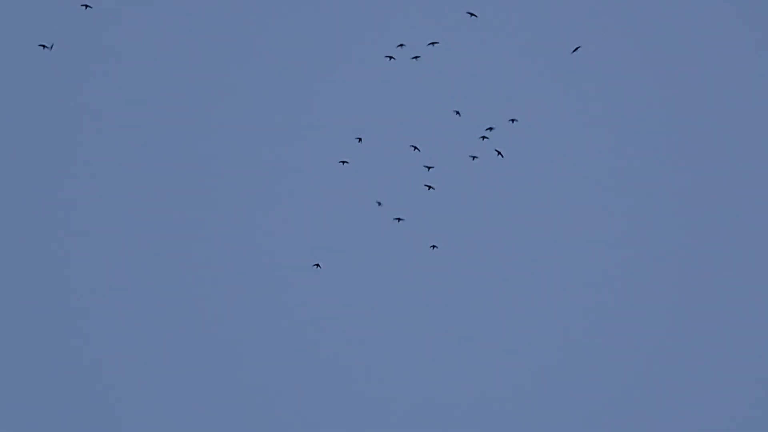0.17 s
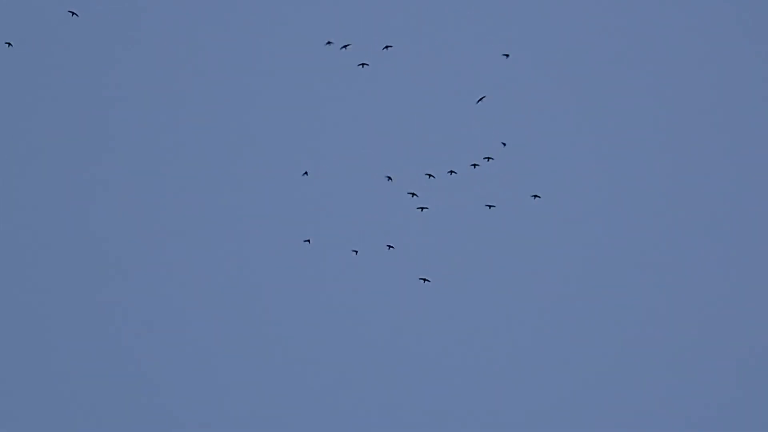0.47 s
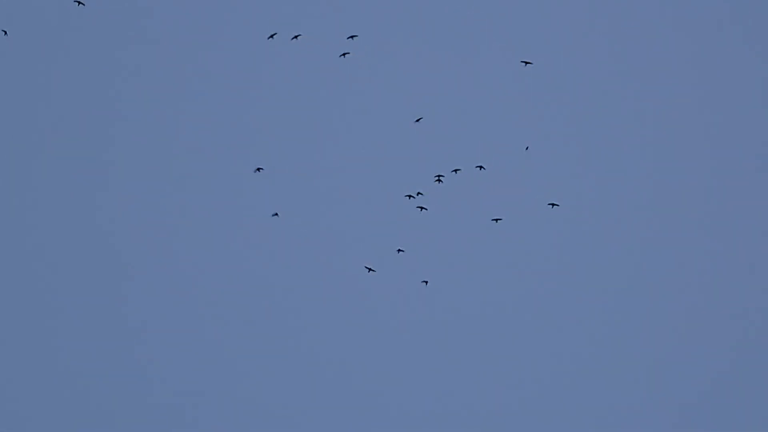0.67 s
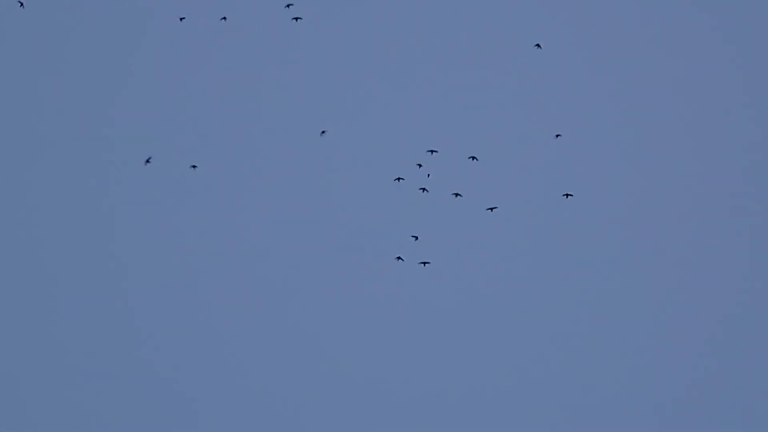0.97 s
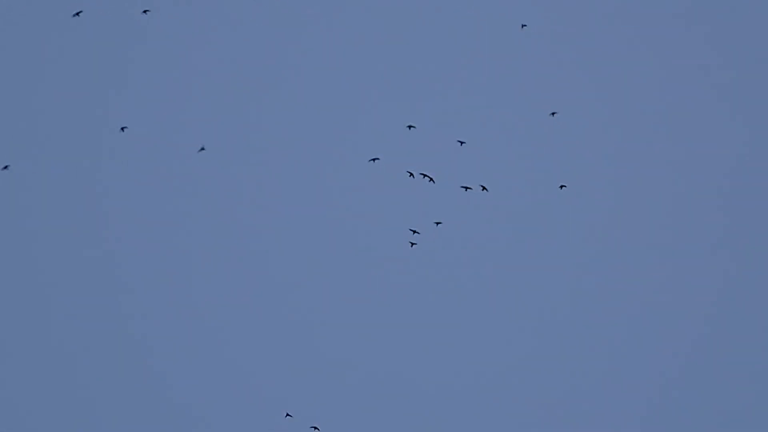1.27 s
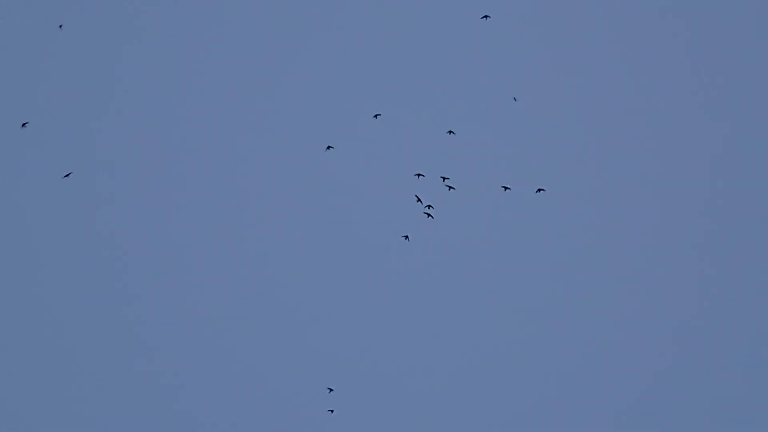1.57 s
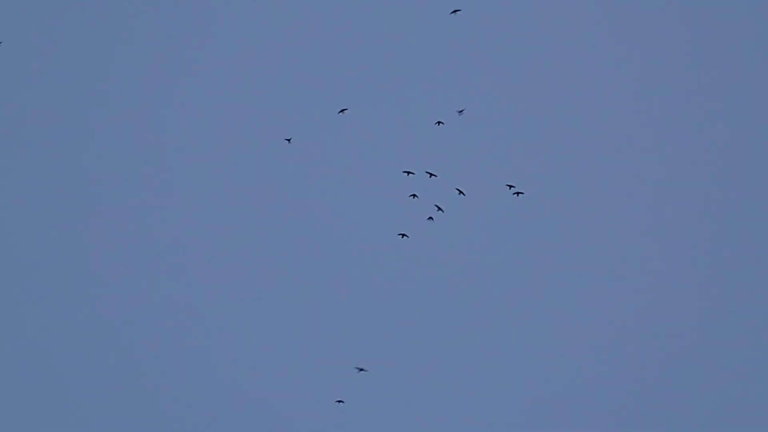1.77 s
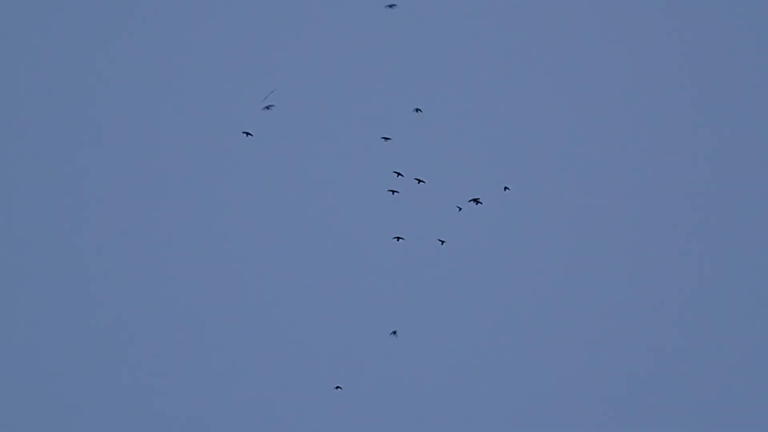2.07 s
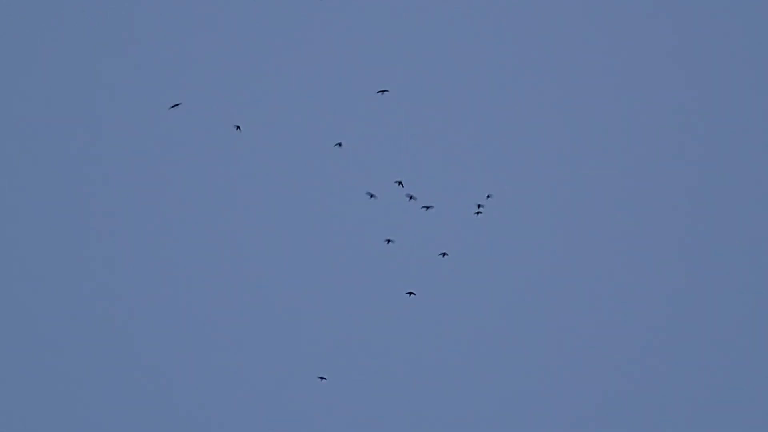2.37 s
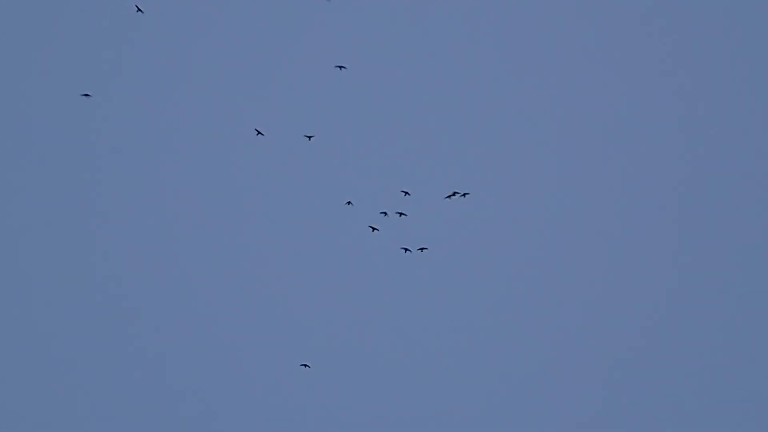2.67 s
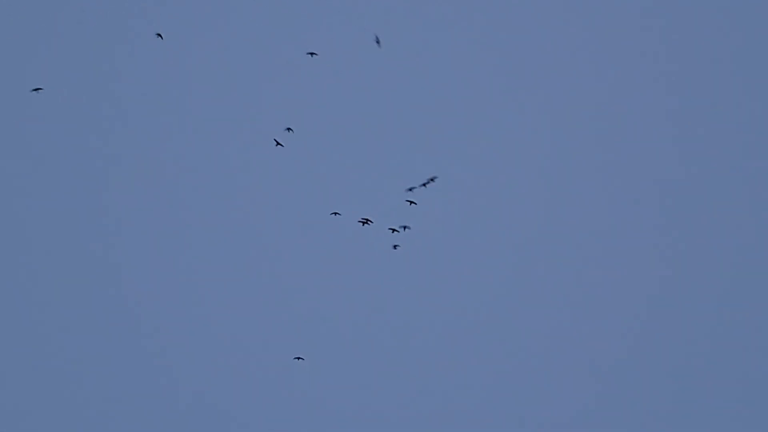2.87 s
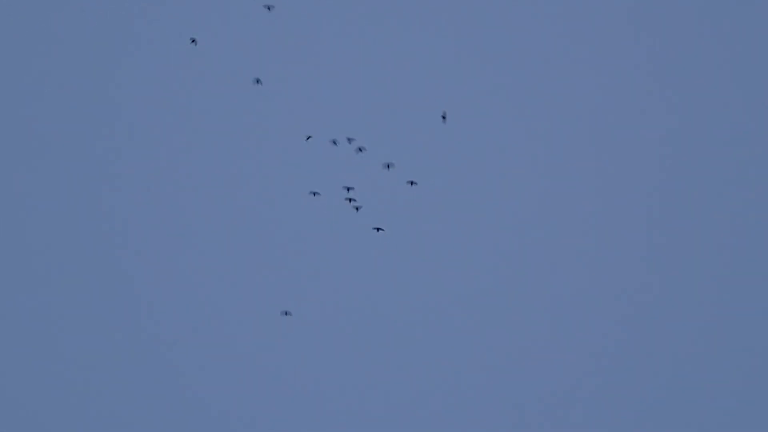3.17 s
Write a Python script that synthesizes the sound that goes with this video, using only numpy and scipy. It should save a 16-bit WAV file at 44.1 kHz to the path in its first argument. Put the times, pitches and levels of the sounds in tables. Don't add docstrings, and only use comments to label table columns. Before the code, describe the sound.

Cicadas dominate: a dense, bright hum around 5 to 6 kHz, wide and diffuse, with a fine pulsing buzz slightly left. A nearer, stronger group sings until about 1.9 s, then cuts off, leaving the far chorus and a thin hiss. Small chirps at 0.9, 1.4 and 2.7 s, faint twitter, low coos from 3.0 s. Low air and road rumble recedes beneath. No wingbeats.

```python
import sys
import numpy as np
from scipy import signal
from scipy.fft import rfft, irfft
from scipy.io import wavfile
from scipy.ndimage import uniform_filter1d

SR = 44100
rng = np.random.default_rng(int(sys.argv[2]) if len(sys.argv) > 2 else 0)


def unload_audio(sound):
    columns = np.transpose(np.atleast_2d(sound))
    steps = np.round(np.clip(columns, -1, 1) * 32767)
    wavfile.write(sys.argv[1], SR, steps.astype(np.int16))


def decibels_to_gain(level_db):
    exponent = np.asarray(level_db, float) / 20
    return 10 ** exponent


N = 146853

# (frequency [Hz], density [dB per Hz])
FAR_BODY = [(4300, -28), (4950, -13), (5250, -4.5), (5600, 0.5), (6150, -4), (6620, -4.5), (7000, -15.5),
            (7350, -30.5)]
FAR_OVERTONE = [(7200, -49), (7480, -34), (7680, -28.5), (8300, -38.5), (9800, -41.5), (11800, -37),
                (13800, -46.5), (15700, -43)]
# (time [s], level [dB])
NEAR_EFFORT = [(0, -28), (.13, -27.5), (.3, -29.5), (.7, -31), (.8, -28), (1.2, -29), (1.5, -28.5),
               (1.73, -27.5), (1.885, -28), (1.915, -46), (1.96, -80)]
# (frequency [Hz], density [dB per Hz])
NEAR_BODY = [(900, -32.5), (3600, -42.5), (4550, -29.5), (5250, -4.5), (5550, -5), (5820, -4), (6150, -33),
             (7200, -52)]
NEAR_OVERTONE = [(7400, -79), (8800, -39.5), (10000, -44), (11700, -39), (13000, -43), (14200, -50),
                 (15700, -45)]
RIBS_HZ = (4955, 5207, 5416, 5545, 5710, 5808)
# (frequency [Hz], density [dB per Hz])
AIR_COLOUR = [(15, -50), (25, -21.5), (70, 2.5), (103, -10), (188, -16), (328, -20.5), (772, -24.5),
              (878, -28), (4200, -39), (5460, -49), (9240, -120)]
# (frequency [Hz], density [dB per Hz])
ROAD_COLOUR = [(40, -18), (70, -7.5), (170, 1), (230, -14.5), (400, -14.5), (800, -23), (2200, -21.5),
               (4500, -36)]
# (time [s], level [dB])
ROAD_LEVEL = [(0, -37), (.25, -40.5), (.6, -42.5), (1, -46), (1.45, -48), (1.7, -49), (2.2, -54.5),
              (3.33, -50)]
# (time [s], pitch [Hz], level [dB], length [s])
CHIRPS = [(.848, 4700, -54, .008), (.897, 4270, -53, 0.012), (.945, 4100, -58, .014),
          (.992, 4180, -58, .014), (1.372, 4900, -39.5, 0.016), (1.42, 4670, -46, 0.016),
          (2.652, 4890, -45, .008), (2.698, 4840, -40, .021), (2.746, 4712, -43.5, 0.044),
          (2.798, 4720, -51, .028), (2.828, 4740, -52, .03), (2.845, 3450, -63, .016),
          (2.9, 3320, -63, 0.012), (.16, 2580, -59.5, .07), (.45, 2110, -56, .06), (1.57, 3020, -64, .04),
          (1.755, 3800, -58, 0.017), (2.13, 3050, -66, 0.046), (1.84, 3200, -68, .04),
          (3.085, 4740, -50, .012)]
# (time [s], pitch [Hz], level [dB], length [s])
COOS = [
    (3.025, 526, -52, 0.077),
    (3.09, 520, -51.5, .13),
    (3.19, 536, -46, .1),
    (1.38, 1240, -61.5, 0.13),
    (1.63, 1320, -58, 0.134),
    (1.83, 1280, -58.5, .07),
    (.44, 1000, -54.5, 0.035),
    (.72, 770, -53, 0.072),
]
# (frequency [Hz], density [dB per Hz])
HISSER_COLOUR = [(6500, -42), (7000, -2), (7450, -6), (7650, 1), (8200, -9), (8800, -10), (9400, -28),
                 (10000, -60)]
# (time [s], level [dB])
HISSER_LEVEL = [(0, -85), (1.88, -80), (1.93, -56), (3.33, -56)]
# (frequency [Hz], left-right likeness [0-1])
LIKENESS = [(70, 0.99), (300, 0.92), (800, 0.41), (1750, 0.067), (2400, 0.49), (4500, 0.067), (8200, 0.35),
            (10000, 0.16)]
# (frequency [Hz], lead [rad])
LEAD = [(60, 0.4), (400, -.5), (1380, -2.5), (2750, -4.5), (4100, -9), (5500, -12), (6800, -11.5),
        (7500, -15.5)]
# (frequency [Hz], left over right [dB])
TILT = [(60, -1), (180, 0), (550, -0.5), (1650, 0.0), (4970, 1.5), (15000, 1)]

CLICK_JITTER, FOLIAGE_WET, SWAY_PER_S = .12, .58, 2.493
RIB_WIDTH_HZ, RIB_DB = 18, 4
BUZZ_DB, BUZZ_PAN_DB, BUZZ_LAG_S = -43, 4.0, .00002
BUZZ_HZ, BUZZ_PULSES_HZ, BUZZ_DRIFT_HZ, BUZZ_RING_S = 6346, 61.0, 3.5, .0045
BUZZ_BODY_HZ, BUZZ_WIDTH_HZ = 6395, 240
TWITTER_DB, TWITTER_FADE_DB_PER_S, TWITTER_HZ, TWITTER_S = -62, -1.5, (500, 4200), (.02, .06)
CHIRP_FALL_HZ_S, CHIRP_ECHO_DB, CHIRP_T60_S = 5.0, -1, .22


def evened(x):
    return x / np.sqrt(np.mean(x ** 2) + 1e-20)


def read(points, hz):
    f, value = np.transpose(points)
    return np.interp(np.log(hz + 1), np.log(f + 1), value)


def curve(points):
    return np.interp(np.arange(N) / SR, *np.transpose(points))


def wander(top_hz, count=24):
    t = np.arange(0, N + 64, 64) / SR
    slow = 0
    for f in np.geomspace(.3, top_hz, count):
        turns = f * rng.uniform(.9, 1.1) * t + rng.random()
        slow = slow + np.sin(2 * np.pi * turns) / np.sqrt(f)
    return np.interp(np.arange(N) / SR, t, evened(slow))


def resonate(x, hz, width_hz):
    turn = np.exp(2j * np.pi * hz * np.arange(len(x)) / SR)
    r = np.exp(-np.pi * width_hz / SR)
    return 2 * (turn * signal.lfilter([1 - r], [1, -r], x / turn)).real


def ports(two, gain):
    hz = np.fft.rfftfreq(N, 1 / SR)
    a, b = rfft(two)
    same = np.clip(read(LIKENESS, hz), 0, 1)
    tilt = decibels_to_gain(read(TILT, hz) / 2)
    left = a * tilt
    right = (same * np.exp(1j * read(LEAD, hz)) * a + np.sqrt(1 - same ** 2) * b) / tilt
    return evened(irfft(np.array([left, right]) * gain(hz), N))


def scatter(x, t60_s):
    t = np.arange(int(.3 * SR)) / SR
    tail = rng.standard_normal((2, len(t))) * decibels_to_gain(-60 * t / t60_s)
    return signal.fftconvolve(x, tail / np.linalg.norm(tail[0]), axes=1)[:, :N]


def swaying(x, t60_s):
    turn = np.pi * SWAY_PER_S * np.arange(N) / SR
    return sum(scatter(x * np.cos(turn + k * np.pi / 3) ** 2, t60_s) for k in range(3))


def chorus(body, overtone, clicks_hz, spread, swell_db, count):
    singers = np.zeros((2, N))
    for k in range(count):
        rate_hz = clicks_hz * (1 + spread * rng.uniform(-1, 1) + .004 * wander(3))
        jitter = CLICK_JITTER * uniform_filter1d(rng.standard_normal(N), 40) * 6
        turns = np.cumsum(rate_hz) / SR + jitter
        clicks = np.diff(np.floor(turns), prepend=0) > 0
        strength = 1 + .33 * rng.standard_normal(N)
        singers[k % 2] += clicks * strength * decibels_to_gain(swell_db * wander(12))
    smeared = (1 - FOLIAGE_WET) * singers + FOLIAGE_WET * swaying(singers, .13)

    def gain(hz):
        ribs_db = RIB_DB * sum(1 / (1 + ((hz - f) / RIB_WIDTH_HZ) ** 2) for f in RIBS_HZ)
        body_db = read([(300, -109)] + list(body) + [(7700, -78)], hz) + ribs_db
        return np.hypot(decibels_to_gain(body_db), decibels_to_gain(read(overtone, hz)))

    return ports(smeared, gain)


def far_chorus():
    return decibels_to_gain(-31) * chorus(FAR_BODY, FAR_OVERTONE, clicks_hz=401.7, spread=.2, swell_db=1, count=14)


def near_group():
    song = chorus(NEAR_BODY, NEAR_OVERTONE, clicks_hz=459.5, spread=.04, swell_db=1.4, count=8)
    return decibels_to_gain(curve(NEAR_EFFORT)) * song


def buzzer():
    drift_hz = BUZZ_DRIFT_HZ * wander(2.03)
    phase = np.cumsum(BUZZ_PULSES_HZ + drift_hz / 10) / SR % 1
    level = np.exp(-phase / BUZZ_PULSES_HZ / BUZZ_RING_S) * decibels_to_gain(2.6 * wander(4.16))
    turns = np.cumsum(BUZZ_HZ + drift_hz) / SR
    pair = []
    for lag_turns in (0, BUZZ_HZ * BUZZ_LAG_S):
        x = level * np.sin(2 * np.pi * (turns - lag_turns))
        for _ in range(2):
            x = resonate(x, BUZZ_BODY_HZ, BUZZ_WIDTH_HZ)
        pair.append(x)
    pan = decibels_to_gain([[BUZZ_PAN_DB / 2], [-BUZZ_PAN_DB / 2]])
    return decibels_to_gain(BUZZ_DB) * evened(np.array(pair)) * pan


def wash(colour, patchy_db):
    z = rng.standard_normal((N // 256 + 5, 513, 5)).T
    patches = evened(uniform_filter1d(uniform_filter1d(z[4], 10, 0), 14, 1))
    depth = np.clip(np.arange(513) / 12, .2, 1)[:, None]
    bins = (z[:2] + 1j * z[2:4]) * decibels_to_gain(patchy_db * patches * depth)
    two = signal.istft(bins, nperseg=1024, noverlap=768)[1][:, :N]
    return ports(two, lambda hz: decibels_to_gain(read(list(colour) + [(9000, -90)], hz)))


def open_air():
    return decibels_to_gain(-40.5) * wash(AIR_COLOUR, patchy_db=2.8)


def road():
    return decibels_to_gain(curve(ROAD_LEVEL)) * wash(ROAD_COLOUR, patchy_db=1.0)


def calls(rows, glide, breath):
    out = np.zeros(N)
    for start_s, hz, db, length_s in rows:
        u = np.arange(0, length_s, 1 / SR) / length_s
        tone = np.sin(2 * np.pi * np.cumsum(glide(hz, u)) / SR)
        flutter = evened(uniform_filter1d(rng.standard_normal(6000), 450))[:len(u)]
        note = tone * np.sin(np.pi * u) * decibels_to_gain(db + 5.5) * (1 + breath * flutter)
        out[round(start_s * SR):][:len(u)] += note
    return np.array([out, out])


def twitter(count=70):
    a, b, c, d = rng.random((count, 4)).T
    start_s = a * (N / SR - .1)
    low_hz, high_hz = TWITTER_HZ
    hz = low_hz * (high_hz / low_hz) ** b
    db = TWITTER_DB + TWITTER_FADE_DB_PER_S * start_s + 5 * c - 2.6 * np.log2(hz / 1000)
    rows = np.transpose([start_s, hz, db, np.interp(d, [0, 1], TWITTER_S)])
    sides = np.array([calls(rows[k::2], lambda f, u: f * (1 - .052 * u), .62)[0] for k in range(2)])
    return sides + .66 * sides[::-1]


def chirps():
    notes = calls(CHIRPS, lambda hz, u: hz - CHIRP_FALL_HZ_S * SR / len(u) * u ** 5, .089)
    return notes + decibels_to_gain(CHIRP_ECHO_DB) * scatter(notes, CHIRP_T60_S)


def coos():
    notes = calls(COOS, lambda hz, u: hz * (1 + .035 * (u - .5)), .35)
    return .8 * notes + .32 * scatter(notes, .11)


def hisser():
    hiss = ports(rng.standard_normal((2, N)), lambda hz: decibels_to_gain(read(HISSER_COLOUR, hz)))
    return decibels_to_gain(curve(HISSER_LEVEL)) * hiss


def scene():
    insects = far_chorus() + near_group() + buzzer() + hisser()
    birds = twitter() + chirps() + coos()
    return insects + birds + open_air() + road()


def top_cut(x):
    return signal.sosfilt(signal.butter(12, 15750, fs=SR, output="sos"), x)


def record(dry):
    return top_cut(dry)


dry = scene()
out = record(dry)
unload_audio(out)
```